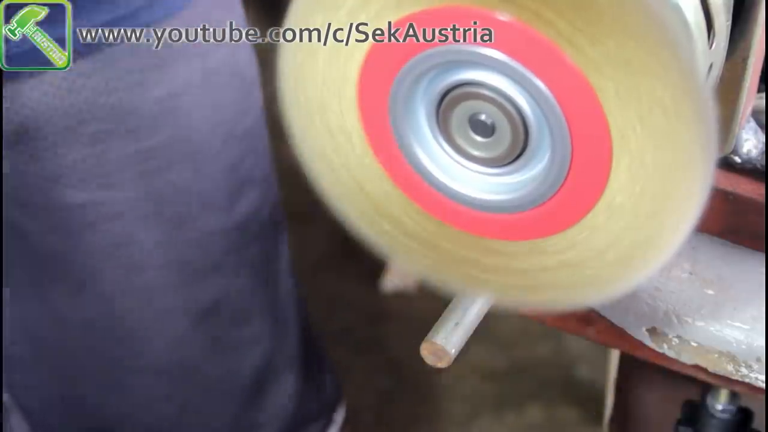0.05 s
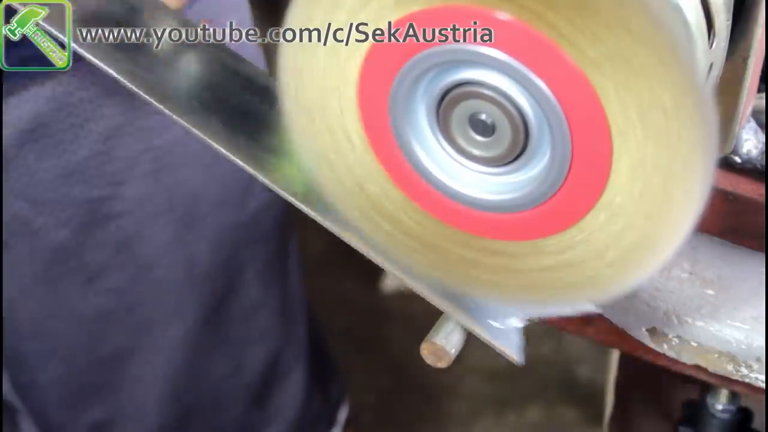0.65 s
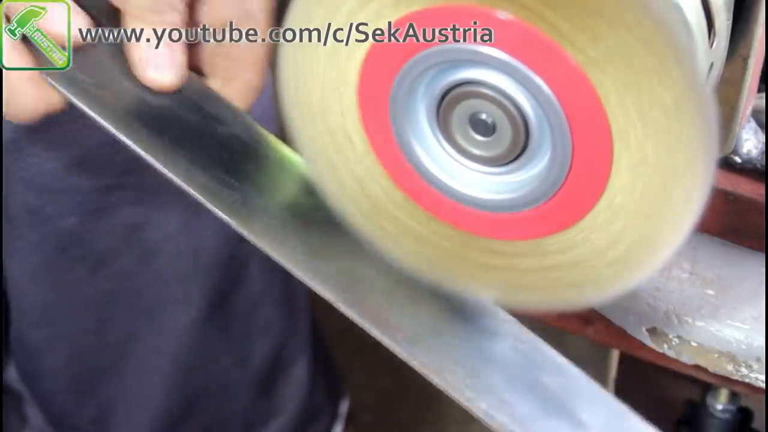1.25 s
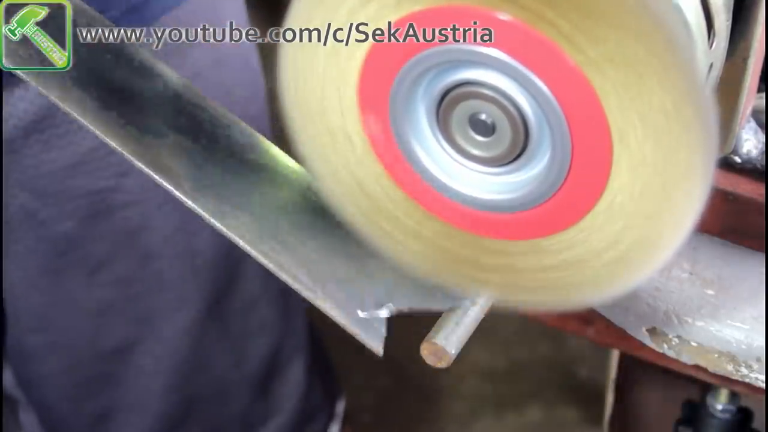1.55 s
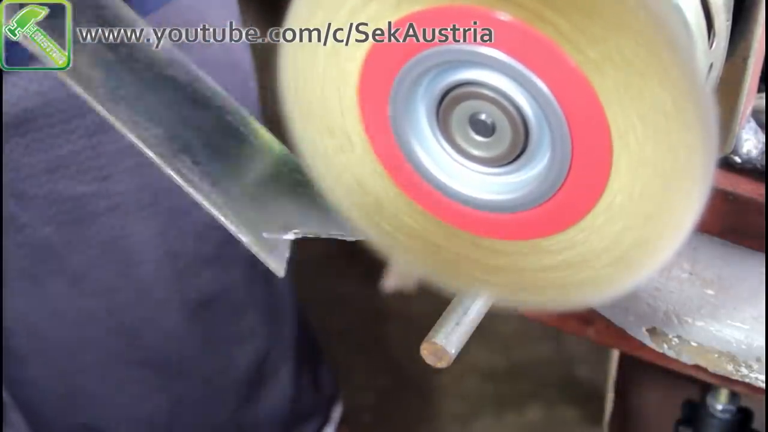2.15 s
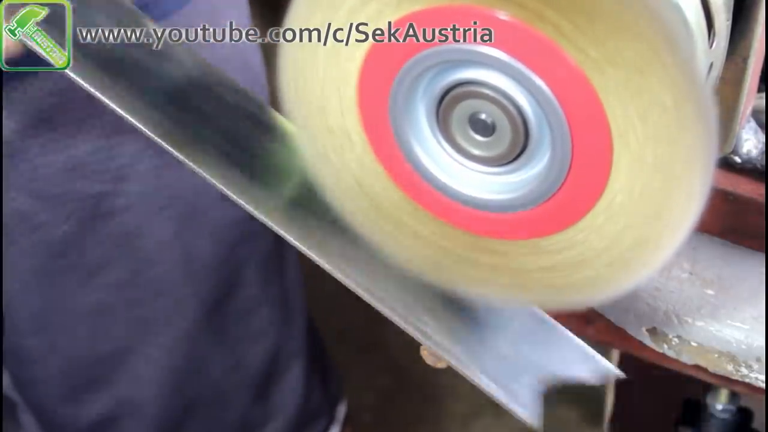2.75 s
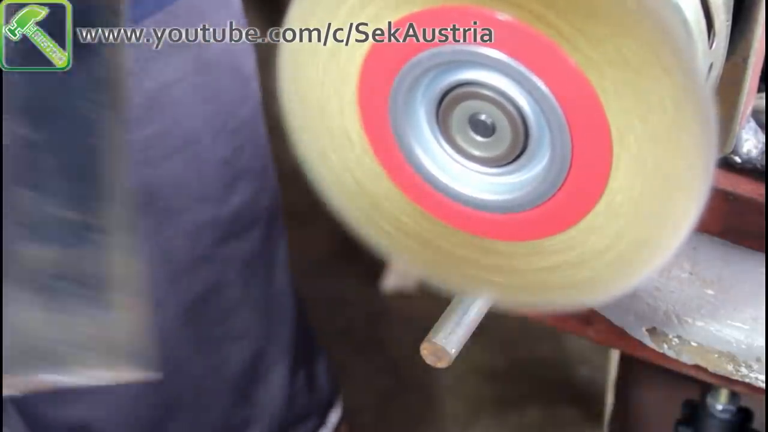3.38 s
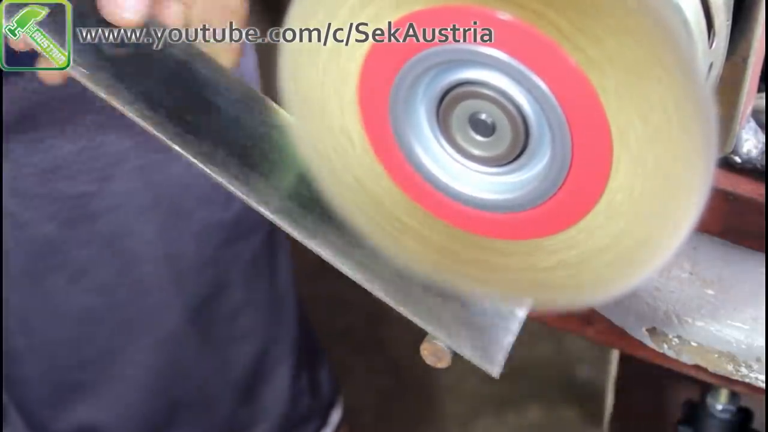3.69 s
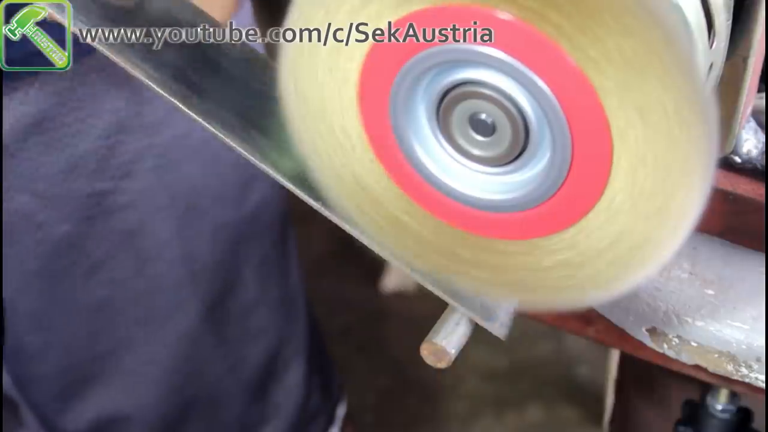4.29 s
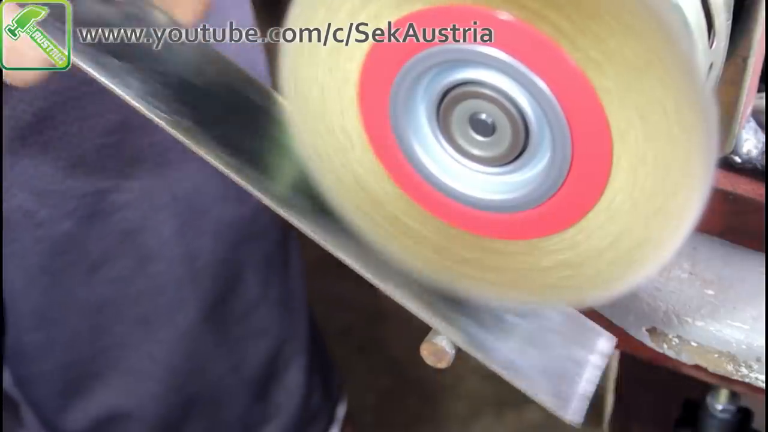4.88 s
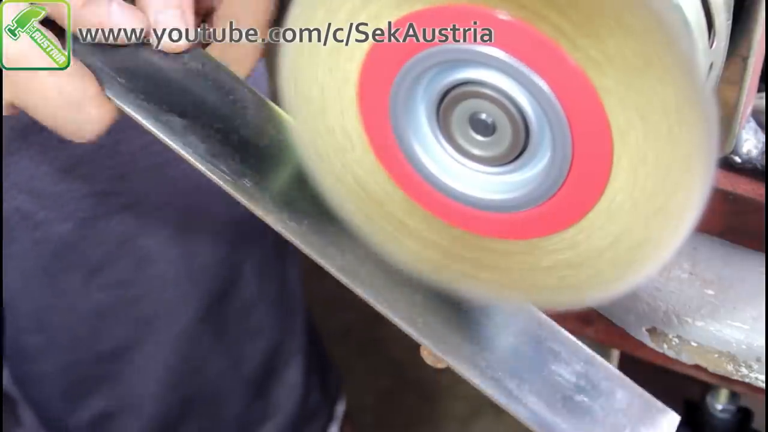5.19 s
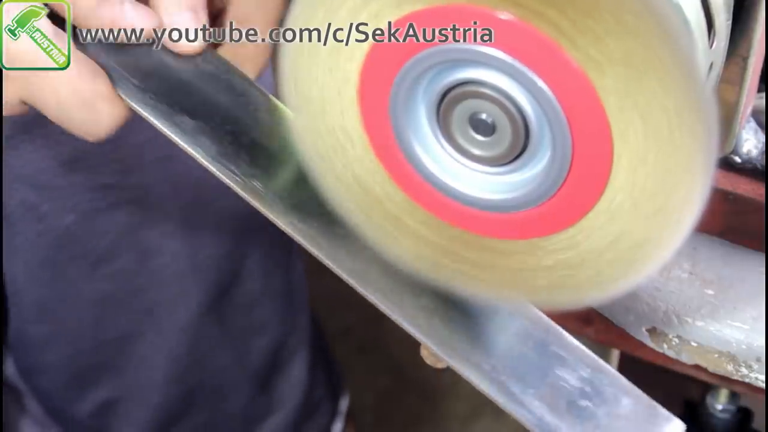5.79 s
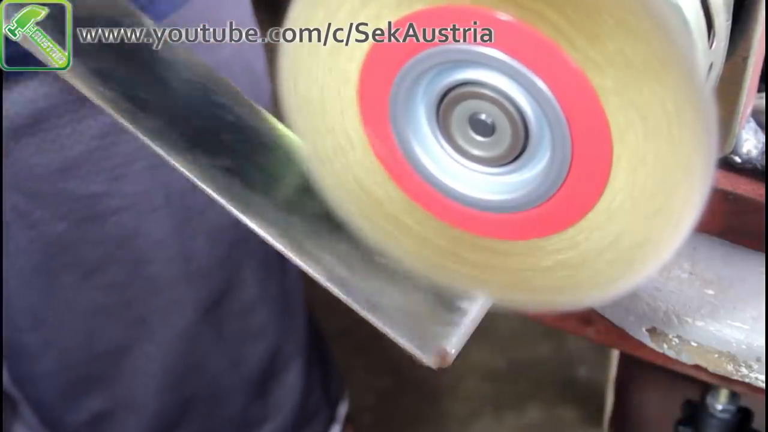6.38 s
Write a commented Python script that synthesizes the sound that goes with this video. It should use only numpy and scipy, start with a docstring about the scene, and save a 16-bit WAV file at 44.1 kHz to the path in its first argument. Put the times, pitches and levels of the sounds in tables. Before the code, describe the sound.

Close and nearly dry, bristles of a spinning workshop wheel scrape a steel blade in rapid, sped-up bursts, broken by two short gaps where the machine faintly whirrs. Tufts snap off the edge with ticks, and the blade briefly rasps, rings and whistles. The bursts give way to a single long, swelling hiss at normal speed, which drops off at the end over a barely audible motor hum.

```python
"""In a workshop, a steel blade meets a motor-driven brush wheel: sped-up passes, then one stroke at
natural speed. Countless bristle impacts excite the modes of the blade and merge into a hiss; caught tufts
snap off its edge as sharp ticks. Pushed in, the blade chatters with a rasp and a hollow ring, and now and
then friction draws a brief whistle from it. Underneath run the hum of the motor, the whirr of its bearing,
the air dragged round by the wheel and a few soft, low bumps."""
import sys
import numpy as np
from scipy import signal
from scipy.fft import rfft, irfft
from scipy.io import wavfile
from scipy.ndimage import uniform_filter1d, map_coordinates

SR = 44100
rng = np.random.default_rng(int(sys.argv[2]) if len(sys.argv) > 2 else 0)


def pcm_store(signal):
    """Save signal as 16-bit PCM."""
    levels = np.round(np.clip(np.atleast_2d(signal), -1, 1) * 32767)
    wavfile.write(sys.argv[1], SR, levels.astype(np.int16).T)


N = 292824
TIME = np.arange(N) / SR
BIN_HZ = np.maximum(np.arange(N // 2 + 1) * SR / N, 1)
TURN_HZ, CUTOFF_HZ = 26.95, 16000   # rotation rate of the wheel; upper limit of the sound

# Line spectrum of the motor. Each row: frequency in Hz, level in dB.
HUM_LINES = [(120, -84.5), (168, -82.5), (183, -81.5), (362, -83), (836, -86.5)]
# Resonances of the bearing. Each row: frequency in Hz, bandwidth in Hz, gain in dB.
BEARING_MODES = [(1890, 250, -10), (3290, 150, 11), (5560, 140, -4.5), (8950, 500, -3.5)]
# Envelope of the bearing's whirr. Each row: time in seconds, level in dB.
WHIRR_LEVELS = [(0, -80), (.2, -82), (.24, -59.5), (.4, -56.5), (.48, -89), (3.3, -79), (3.38, -75.5),
                (3.53, -59.5), (3.62, -89), (6.5, -73.5), (6.64, -66.5)]
# Spectrum of the draught and of the blade's rumble. Each row: frequency in Hz, relative level in dB.
RUMBLE_SPECTRUM = [(20, -36), (55, -6), (120, 2.5), (180, -1.5), (260, -0.5), (370, 1), (500, 4.5),
                   (900, 3.5), (2000, -11.5), (6000, -53)]
# Envelope of the air dragged round by the wheel. Each row: time in seconds, level in dB.
DRAUGHT_LEVELS = [(0, -61.5), (0.35, -74), (0.55, -76.5), (1.0, -76.5), (1.6, -66.5), (2.05, -72.5),
                  (2.5, -79.5), (2.8, -66), (3.4, -62.5), (3.7, -73.5), (4.3, -74.5), (4.9, -70.5),
                  (5.2, -67), (5.6, -65.5), (6.1, -66), (6.64, -74)]
# Pace of the sound. Each row: time in seconds, pace from 1 (rapid, sped-up passes)
# to 0 (long stroke at natural speed).
PACE = [(4.35, 1), (4.47, 0)]
# Sped-up passes over the wheel. Each row: start in seconds, length in seconds, mid-band level in dB,
# growth over the pass in dB, coarse bite and fine sheen in dB relative to the mid band.
QUICK_PASSES = [(0.025, 0.0054, -45.5, 1, -3, 0), (0.061, 0.035, -51.5, -4, -7, -2),
                (0.117, 0.049, -47.5, -3, -3.5, 1), (0.437, 0.0016, -50.5, -5, 17, -35),
                (0.49, 0.016, -42, 8, 1.5, -18), (0.526, 0.028, -40, -8, -14, -11.5),
                (0.586, 0.054, -36, 4.5, -10.5, -4.5), (0.665, 0.024, -47.5, -3, 2, -2),
                (0.704, 0.036, -40.5, 12.5, -11.5, 0), (0.752, 0.055, -39.5, -16, -5.5, -3),
                (0.815, 0.125, -46.5, -1.5, 0, 3.5), (0.945, 0.05, -43.5, -9, -10, -1),
                (1.037, 0.014, -54.5, -5, -4, -2), (1.068, 0.088, -48, 1, -4, 0),
                (1.17, 0.049, -40, 17.5, -7, -13), (1.24, 0.075, -44.5, -5, 0, -5.5),
                (1.334, 0.078, -43.5, 0.5, -6, 3), (1.432, 0.058, -49.5, -6, -5, -4),
                (1.472, 0.022, -47, 8, 2.5, 2), (1.507, 0.029, -40.5, -10, -1.5, -8),
                (1.583, 0.07, -44, 4, -3.5, -1), (1.651, 0.084, -41.5, -1, -12, 4.5),
                (1.758, 0.048, -50.5, -2, -23, -6), (1.835, 0.079, -47, -3.5, -6.5, -6),
                (1.93, 0.088, -44, 4, -5.5, -5), (2.053, 0.03, -56.5, 4, -15, 1),
                (2.116, 0.039, -44, 5, -7, -10), (2.179, 0.05, -44, 3.5, -11, 1),
                (2.253, 0.051, -39.5, 3.5, -22, 1.5), (2.313, 0.15, -50, -6, -9, 3),
                (2.472, 0.045, -48.5, -7, -14, 4.5), (2.544, 0.087, -49, -3, 1.5, 1.5),
                (2.651, 0.14, -42.5, 13, -1.5, -4), (2.797, 0.09, -49.5, -15, 3.5, -11),
                (2.887, 0.078, -48, -8.5, 2.5, -8), (2.983, 0.039, -41, -2, 2, -2.5),
                (3.042, 0.028, -44.5, 7.5, -3, -4), (3.1, 0.067, -49.5, 2, -8, -4.5),
                (3.169, 0.15, -41, -3, -5.5, -6), (3.636, 0.0055, -37.5, -2.5, -10, 2),
                (3.69, 0.018, -41, 3, -14, -5), (3.724, 0.034, -43, 6, -3.5, -1),
                (3.779, 0.052, -42, 6, -9.5, -1), (3.828, 0.08, -40.5, -8.5, -10, 2),
                (3.968, 0.025, -38, -0.5, -15.5, -2), (4.013, 0.035, -44, 5, -21, 1),
                (4.06, 0.01, -34.5, -2, -15, -9), (4.093, 0.027, -38.5, -8, -10.5, -8),
                (4.116, 0.046, -49.5, -10, -7, -10), (4.195, 0.027, -43, 0, -20.5, -2),
                (4.247, 0.035, -50.5, 14, -8, 0), (4.305, 0.09, -45.5, 2, -12.5, -2.5)]
# The long stroke. Each row: time in seconds, mid-band level in dB, bite and sheen in dB relative to it.
LONG_STROKE = [(4.41, -46.5, -15, -4), (4.48, -41.5, -17, 2), (4.62, -45, -22, 3.5),
               (4.78, -39.5, -29, -0.5), (4.88, -37, -16, 0), (5.039, -35.5, -18, -7),
               (5.158, -29, -10, -4), (5.31, -35.5, -12.5, -1.5), (5.41, -31.5, -12, -2),
               (5.54, -36, -17.5, -6.5), (5.73, -39.5, -9, -3), (5.94, -32.5, -15.5, -0.5),
               (6.14, -38.5, -7, -3), (6.3, -35, -10.5, -3.5), (6.428, -46.5, 0.5, 3.5),
               (6.5, -67.5, -6, -7)]
# Spectrum of bristles striking steel. Each row: frequency in Hz, relative level in dB.
HISS_SPECTRUM = [(500, -40), (1400, -11), (2300, -2), (3300, 0.5), (4100, -1), (4900, 1), (6200, -1.5),
                 (7000, -1.5), (8500, -2.5), (9400, 1), (10800, 4), (13500, 8), (16000, 6.5)]
# Modes of the blade. Each row: frequency in Hz, bandwidth in Hz, relative gain in dB.
BLADE_MODES = [(4290, 110, -17.5), (4970, 160, 1), (5740, 42, -5.5), (6160, 160, 4), (7100, 110, -7.5),
               (8660, 110, 0.5), (14300, 140, -18)]
# Pushes into the wheel. Each row: time in seconds, relative levels of rasp and ring in dB, pitch in Hz.
PUSHES = [(0.086, -37, -42.5, 779), (0.133, -39, -35.5, 755.8), (0.423, -31, -29.5, 793),
          (0.437, -36.5, -39.5, 805.6), (0.492, -50, -43, 713), (0.675, -46, -42, 801),
          (0.849, -41.5, -46.5, 835), (0.886, -42.5, -36, 795.2), (1.052, -41.5, -38, 780),
          (1.091, -36, -28, 792.1), (1.142, -45.5, -36, 787), (1.231, -45, -41, 825),
          (1.277, -50.5, -44.5, 817), (1.405, -44, -38.5, 837), (1.455, -41, -40, 791),
          (1.548, -42.5, -35.5, 852.3), (1.787, -36, -35, 805), (1.851, -34, -37, 834),
          (1.894, -42.5, -35.5, 807), (1.983, -59, -49, 833), (2.03, -56, -50.5, 849),
          (2.141, -47.5, -41, 830.2), (2.295, -41.5, -46.5, 881.2), (2.348, -46.5, -42.5, 861),
          (2.435, -36.5, -31, 838), (2.453, -44, -33.5, 830.5), (2.817, -41.5, -41, 874),
          (2.861, -40, -33.5, 883), (2.889, -50, -44, 884.4), (2.948, -43, -40, 876),
          (3.003, -41.5, -39, 873), (3.055, -47, -36.5, 851), (3.145, -38, -36.5, 809),
          (3.346, -38, -30, 795.5), (3.392, -41, -32.5, 780.3), (3.412, -43, -40, 780),
          (3.439, -55, -49, 710), (3.575, -38.5, -29.5, 791), (3.624, -37.5, -34, 789.3),
          (3.763, -49.5, -51.5, 874.4), (3.849, -46, -31, 872.2), (4.228, -64.5, -55, 777),
          (4.3, -50.5, -50, 796), (4.547, -58.5, -57.5, 808), (4.768, -49.5, -45, 795),
          (4.83, -50.5, -57, 800), (5.204, -34.5, -31, 825), (5.274, -49.5, -42.5, 835),
          (5.42, -36, -38, 846.5), (5.706, -43, -46, 821.7), (5.77, -45.5, -47.5, 835),
          (6.085, -31, -33, 833.7), (6.166, -41, -50, 837), (6.36, -51, -38, 813)]
# Spectrum of the chattering contact. Each row: frequency in Hz, relative level in dB.
RASP_SPECTRUM = [(200, -32), (480, -13), (640, -4), (900, 5.5), (1120, -1.5), (1600, 3.5), (1900, -1.5),
                 (2350, -7), (2650, -4), (3400, -28), (4500, -41), (8000, -77)]
# Resonances of the rasp. Each row: frequency in Hz, bandwidth in Hz, relative gain in dB.
RASP_MODES = [(1132, 53, 5), (1242, 6.8, 9), (1416, 47, -1), (1445, 7.3, -8.5), (1598, 12, 0.5),
              (2240, 32, 4.5)]
# Soft bumps. Each row: centre in seconds, half length in seconds, level in dB, upper band edge in Hz.
LOW_BUMPS = [(0.157, 0.018, -59, 500), (0.294, 0.018, -54, 233), (0.372, 0.026, -56.5, 231),
             (1.106, 0.045, -53.5, 640), (1.54, 0.063, -58.5, 560), (1.647, 0.013, -52.5, 350),
             (1.9, 0.017, -53.5, 530), (2.731, 0.052, -58, 451), (3.317, 0.089, -58, 530),
             (3.833, 0.02, -52, 405), (5.155, 0.03, -53.5, 526), (5.95, 0.07, -59.5, 494),
             (6.331, 0.11, -57, 563)]
# Tufts catching the edge. Each row: start in seconds, relative level in dB.
TUFT_SNAPS = [(0.4919, -30), (0.505, -27), (0.5268, -24), (0.6397, -40), (0.7573, -24.5), (0.7663, -30.0),
              (0.7874, -25), (0.817, -28.5), (0.893, -28.5), (0.908, -31.5), (0.9601, -25), (0.98, -30),
              (1.1254, -30.0), (1.192, -27.5), (1.215, -34), (1.505, -27), (1.9425, -30.0), (1.9536, -28.5),
              (1.9718, -29), (2.4783, -33), (2.569, -28.0), (2.7971, -28.5), (2.8984, -41), (2.922, -31.0),
              (3.647, -21.5), (3.6686, -32), (3.7317, -24), (3.739, -26.5), (3.862, -44), (3.879, -24.5),
              (4.128, -34), (4.4235, -31.5), (4.4363, -35), (5.398, -24)]
# Whistles of the edge. Each row: centre and half length in seconds, pitch in Hz, relative level in dB.
WHISTLES = [(0.497, 0.004, 4250, -34), (0.528, 0.0042, 5790, -33.5), (0.777, 0.014, 2870, -38.5),
            (2.225, 0.01, 5700, -43), (2.287, 0.014, 5240, -42.5), (2.302, 0.019, 7600, -43),
            (2.388, 0.021, 5590, -46.5), (2.572, 0.018, 2256, -46), (4.901, 0.012, 2580, -43.5),
            (5.947, 0.012, 9244, -38)]
# Stereo width. Each row: frequency in Hz, side level in dB relative to the mid signal.
STEREO_WIDTH = [(60, -24), (300, -24), (700, -16), (1300, -12), (2500, -16), (14000, -15)]


def from_db(db):
    """Amplitude grows tenfold for every 20 dB."""
    return 10 ** (np.asarray(db) / 20)


def unit_rms(x):
    """Normalisation to an rms of 1."""
    return x / np.sqrt(np.mean(x ** 2) + 1e-20)


def in_time(rows):
    """Linear interpolation gives each column of a curve at every sample."""
    times, *columns = np.transpose(rows)
    return [np.interp(TIME, times, column) for column in columns]


def colour(points):
    """A spectral envelope: gain per bin, interpolated in dB over log frequency."""
    hz, db = np.transpose(points)
    return from_db(np.interp(np.log(BIN_HZ), np.log(hz), db))


def resonances(modes):
    """Superposition: the responses of damped modes add in each frequency bin."""
    return sum(from_db(db) / (1 + 1j * hz / width * (BIN_HZ / hz - hz / BIN_HZ))
               for hz, width, db in modes)


def filtered(x, response):
    """Filtering multiplies the spectrum by a response; the result has rms 1."""
    return unit_rms(irfft(rfft(x) * response, N))


def noise(response):
    """White noise takes on the spectrum of its filter."""
    return filtered(rng.standard_normal(N), response)


def drift(rate_hz):
    """Low-passed noise of rms 1 serves as a slow random modulation."""
    step, points = 16, 32768
    hz = np.fft.rfftfreq(points, step / SR)
    slow = irfft(rfft(rng.standard_normal(points)) / (1 + (hz / rate_hz) ** 4))
    return np.interp(TIME, np.arange(points) * step / SR, unit_rms(slow))


def evened(x):
    """Division by the running rms, taken over some 30 ms, leaves only grain and colour to vary."""
    power = uniform_filter1d(uniform_filter1d(x ** 2, size=1300), size=900)
    return x / np.sqrt(power + 1e-9)


def swell(at_s, half_s, skew=0):
    """A Gaussian bell of power; skew makes it rise faster than it falls."""
    age = (TIME - at_s) / half_s + skew
    return np.exp(-np.minimum((age / (1 + skew * np.sign(age))) ** 2, 60))


def wheel_wobble(depth_db):
    """Amplitude modulation: the uneven wheel presses harder once a turn."""
    turns = np.cumsum(TURN_HZ * (1 + 0.024 * drift(1.5))) / SR
    return from_db(depth_db * np.cos(2 * np.pi * turns))


def motor_hum(waver_db):
    """The motor radiates a line spectrum, each line wavering in level and phase."""
    hum = 0
    for hz, db in HUM_LINES:
        amplitude = np.sqrt(2) * from_db(db + waver_db * drift(6.8))
        hum = hum + amplitude * np.sin(2 * np.pi * hz * TIME + 1.23 * drift(8.6))
    return hum


def bearing_whirr(floor_db):
    """Noise excites the bearing's resonances, which stand above a broad floor of hiss."""
    response = np.hypot(abs(resonances(BEARING_MODES)), from_db(floor_db)) / (1 + (BIN_HZ / 10500) ** 8)
    level_db, = in_time(WHIRR_LEVELS)
    return from_db(level_db) * noise(response) * wheel_wobble(depth_db=4.5)


def wheel_draught(gust_db):
    """Air dragged round by the wheel gives gusty low-frequency noise."""
    level_db, = in_time(DRAUGHT_LEVELS)
    return from_db(level_db + gust_db * drift(9)) * noise(colour(RUMBLE_SPECTRUM))


def bristle_strikes(per_s, spread_db):
    """Shot noise: single bristles hit at random, a few much harder than the rest."""
    sizes = from_db(spread_db * np.minimum(rng.exponential(1, N), 5)) * rng.choice([-1, 1], N)
    return sizes * (rng.random(N) < per_s / SR)


def snags(per_s, decay_s, height):
    """Small tufts snag at random; each jump of force relaxes exponentially."""
    jumps = (rng.random(N) < per_s / SR) * rng.uniform(.4, 1, N)
    return height * signal.lfilter([1], [1, -np.exp(-1 / (decay_s * SR))], jumps + 1e-18)


def blade_reflection(x, share, swing_s):
    """Comb filtering: a reflection off the moving blade slides ripples through the spectrum."""
    delay_s = 0.001049 + swing_s * drift(1.34)
    reflected = map_coordinates(x, [(TIME - delay_s) * SR], order=3, mode="wrap")
    return unit_rms(x + share * reflected)


def wandering_modes(x, quick_db, slow_db):
    """Groups of blade modes wax and wane as the contact point slides across their nodes."""
    pace, = in_time(PACE)
    edges_hz = np.r_[0, np.linspace(2000, 15600, 29) + rng.uniform(-110, 110, 29), SR]
    spectrum, bands = rfft(x), 0
    for low, high in zip(edges_hz, edges_hz[1:]):
        gain = from_db(quick_db * pace * drift(10) + slow_db * (1 - pace) * drift(3.5))
        bands = bands + gain * irfft(spectrum * (BIN_HZ >= low) * (BIN_HZ < high), N)
    return unit_rms(bands)


def contact_gains(grab_db_per_s, slip_db_per_s):
    """Passes take hold and slip off; being incoherent, they add in power in each of three bands."""
    def gate_db(start, end):
        return -grab_db_per_s * np.maximum(start - TIME, 0) - slip_db_per_s * np.maximum(TIME - end, 0)
    mid_db, bite_db, sheen_db = in_time(LONG_STROKE)
    stroke_db = np.maximum(mid_db + gate_db(LONG_STROKE[0][0], LONG_STROKE[-1][0]), -150)
    power = from_db(stroke_db + np.array([bite_db, np.zeros(N), sheen_db])) ** 2
    for start, length, db, growth, bite, sheen in QUICK_PASSES:
        gate = gate_db(start, start + length)
        near = gate > -60
        progress = np.clip((TIME[near] - start) / length, 0, 1) - .5
        envelope = from_db(db + growth * progress + gate[near])
        power[:, near] += np.outer(from_db([bite, 0, sheen]), envelope) ** 2
    return np.sqrt(power)


def bristle_hiss(quick_grain_db, slow_grain_db, flutter_db, gain_db):
    """Dense impacts excite the steel; each pass has its own mix of coarse bite and fine sheen."""
    pace, = in_time(PACE)
    grain_db = (slow_grain_db + (quick_grain_db - slow_grain_db) * pace) * drift(380)
    grit = 1 + pace * snags(per_s=45, decay_s=.002, height=1.3)
    force = evened(from_db(grain_db + flutter_db * pace * drift(35)) * grit)
    steel = colour(HISS_SPECTRUM) * (1 + 0.44 * resonances(BLADE_MODES))
    rub = filtered(bristle_strikes(per_s=22000, spread_db=3.0), steel)
    rub = blade_reflection(rub, share=.28, swing_s=.0002)
    rub = wandering_modes(rub, quick_db=4.2, slow_db=2.5)
    coarse = 1 / (1 + (BIN_HZ / 4150) ** 24)
    fine = 1 / (1 + (9000 / BIN_HZ) ** 10)
    bands = np.array([coarse, 1 - coarse - fine, fine]) * (BIN_HZ < CUTOFF_HZ)
    gains = contact_gains(grab_db_per_s=1507, slip_db_per_s=951)
    hiss = sum(evened(filtered(rub, band)) * gain for band, gain in zip(bands, gains))
    return from_db(gain_db) * hiss * force * wheel_wobble(depth_db=0.97)


def rough_tone(carrier, width_hz):
    """Random modulation of amplitude and phase widens a complex tone into a narrow band of noise."""
    return np.real((drift(width_hz) + 1j * drift(width_hz)) * carrier)


def blade_shudder(jolt_half_s, lean_half_s, rough_db, ring_db, rasp_db, rumble_db):
    """Friction chatter: a rasp, a faint rumble and a hollow ring pitched by where the blade is held."""
    rasp_power, ring_power, weighted_hz = 0, 0, 0
    for at_s, rasp_level, ring_level, hz in PUSHES:
        # a push sounds as a jolt when sped up, as a slow lean at natural speed
        pace = np.interp(at_s, *np.transpose(PACE))
        half_s = lean_half_s + (jolt_half_s - lean_half_s) * pace
        push = swell(at_s, half_s, skew=0.16 * pace)
        bend = 1 - .07 * np.clip((at_s - TIME) / half_s - .5, 0, 1)   # pitch rises as contact stiffens
        rasp_power += push * from_db(rasp_level) ** 2
        ring_push = push * from_db(ring_level) ** 2
        ring_power += ring_push
        weighted_hz += ring_push * hz * bend
    phase = 2 * np.pi * np.cumsum(weighted_hz / ring_power) / SR
    main_mode, lower_mode = (rough_tone(np.exp(1j * ratio * phase), width_hz=50.4) for ratio in (1, .79))
    ring = from_db(ring_db) * evened(main_mode + from_db(-19.5) * lower_mode)
    response = colour(RASP_SPECTRUM) * (1 + 1.28 * resonances(RASP_MODES))
    rasp = from_db(rasp_db) * evened(filtered(bristle_strikes(per_s=3500, spread_db=2.0), response))
    rumble = from_db(rumble_db) * noise(colour(RUMBLE_SPECTRUM))
    chatter = unit_rms(from_db(rough_db * drift(173)))
    return chatter * (ring * np.sqrt(ring_power) + (rasp + rumble) * np.sqrt(rasp_power))


def low_bumps():
    """Short swells of low-passed noise are heard as dull bumps."""
    body = colour([(25, -15.5), (70, -11), (130, -0.5), (200, -2.0), (300, -2.5), (700, 8.5)])
    return sum(from_db(db) * np.sqrt(swell(at_s, half_s)) * noise(body / (1 + (BIN_HZ / edge_hz) ** 6))
               for at_s, half_s, db, edge_hz in LOW_BUMPS)


def tuft_ticks(tail_s, tail_db, gain_db, catch_s, catch_turns):
    """Sudden release is broadband: a caught tuft snaps off the edge with a crack and a bright spray."""
    single = [(start, db, .0042) for start, db in TUFT_SNAPS]
    # one tuft catches again on every turn, less each time
    repeated = [(catch_s + turn / TURN_HZ, -16.5 - 2.85 * turn, .004) for turn in range(catch_turns)]
    envelope = np.zeros(N)
    age = np.arange(SR // 20) / SR
    attack = 1 - np.exp(-age / .0003)
    for start, db, decay_s in single + repeated:
        at = int(start * SR)
        shape = attack * (np.exp(-age / decay_s) + from_db(tail_db) * np.exp(-age / tail_s))
        envelope[at:at + len(age)] += from_db(db + gain_db) * shape[:N - at]
    spray = noise(colour([(1000, -40), (2200, -1.5), (3200, 6), (6000, 5.0), (9000, 7.0),
                          (13000, -1.0), (16000, -35), (18000, -49)]))
    return envelope * blade_reflection(spray, share=0.31, swing_s=0.000362)


def edge_whistles(width_hz, gain_db):
    """Friction drives single blade modes into short, rough whistles."""
    carriers = sum(from_db(db + gain_db) * np.sqrt(swell(at_s, half_s)) * np.exp(2j * np.pi * hz * TIME)
                   for at_s, half_s, hz, db in WHISTLES)
    return rough_tone(carriers, width_hz)


def workshop_reverb(x, t60_s, dull_hz):
    """Diffuse reflections form an exponentially decaying tail, duller than the direct sound."""
    age = np.arange(SR // 2) / SR
    tail = rng.standard_normal(len(age)) * from_db(-60 * age / t60_s) * (age > .004)
    tail /= np.sqrt(np.sum(tail ** 2))
    tail = signal.sosfilt(signal.butter(1, dull_hz, fs=SR, output="sos"), tail)
    return signal.fftconvolve(x, tail)[:N]


def stereo_image(mid):
    """A side signal in quadrature makes the image flicker in the sped-up passes; then it is centred."""
    pace, = in_time(PACE)
    quadrature, side = 1j * rfft(mid) * colour(STEREO_WIDTH), 0
    edges_hz = np.geomspace(60, 16000, 13)
    for low, high in zip(edges_hz, edges_hz[1:]):
        side = side + drift(8.4) * irfft(quadrature * (BIN_HZ >= low) * (BIN_HZ < high), N)
    return np.array([mid + pace * side, mid - pace * side])


def scene():
    """Sound pressures add: the blade close by, its reverberation, and the machine underneath."""
    blade = bristle_hiss(quick_grain_db=0.5, slow_grain_db=1.0, flutter_db=1.5, gain_db=0.42)
    blade += blade_shudder(jolt_half_s=0.011, lean_half_s=0.0409, rough_db=1.5,
                           ring_db=0.04, rasp_db=1.5, rumble_db=-22)
    blade += tuft_ticks(tail_s=0.027, tail_db=-18.5, gain_db=-2.0, catch_s=5.4355, catch_turns=6)
    blade += edge_whistles(width_hz=240, gain_db=4.0)
    room = from_db(-19.5) * workshop_reverb(blade, t60_s=0.11, dull_hz=2500)
    machine = motor_hum(waver_db=2.2) + bearing_whirr(floor_db=-14) + wheel_draught(gust_db=4.0)
    return stereo_image(blade + room + machine + low_bumps())


def record(dry):
    """A steep low-pass filter removes the highest treble."""
    return irfft(rfft(dry) / (1 + (BIN_HZ / CUTOFF_HZ) ** 300), N)


dry = scene()
out = record(dry)
pcm_store(out)
```